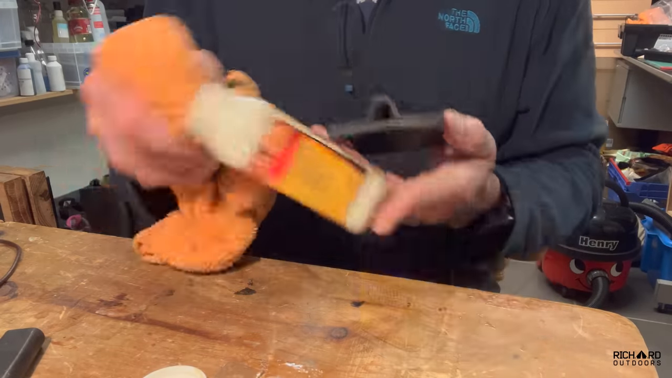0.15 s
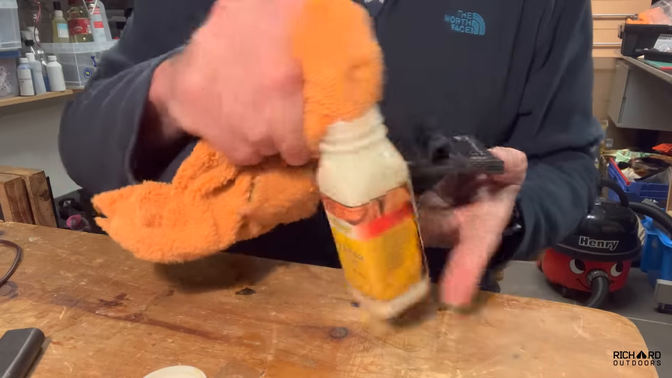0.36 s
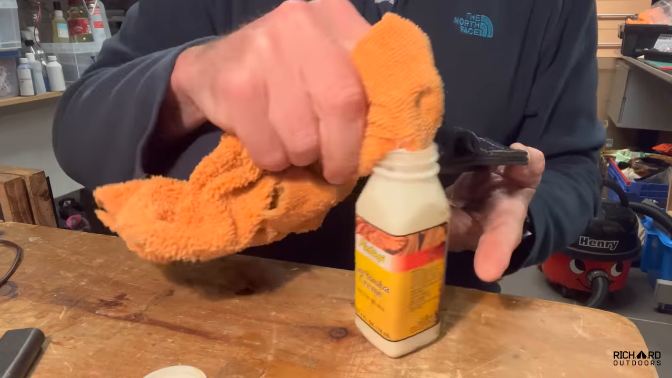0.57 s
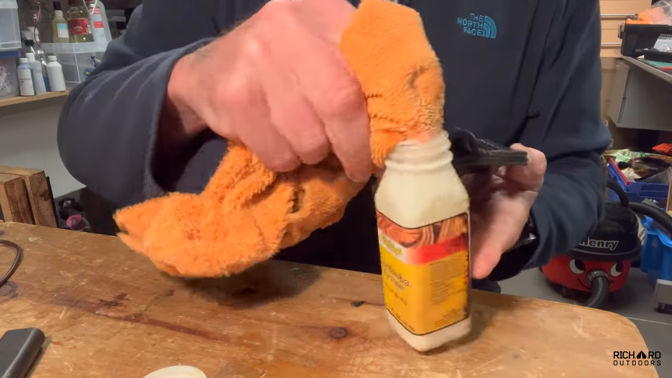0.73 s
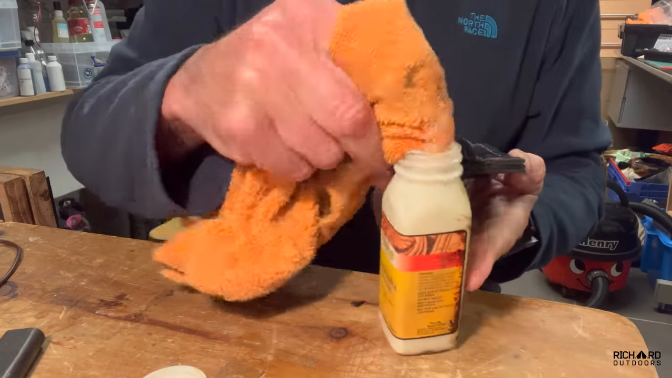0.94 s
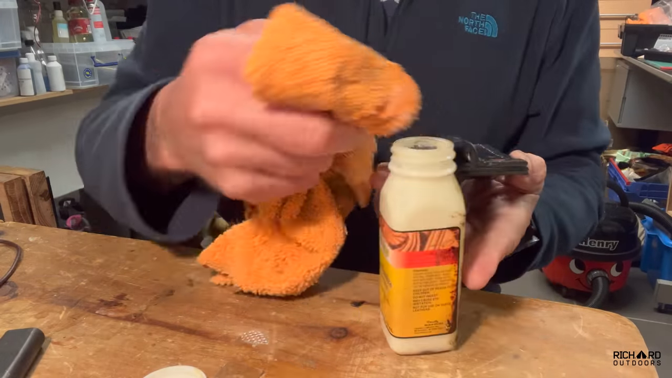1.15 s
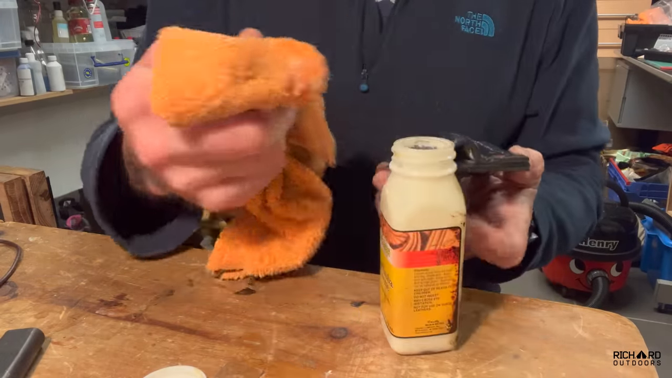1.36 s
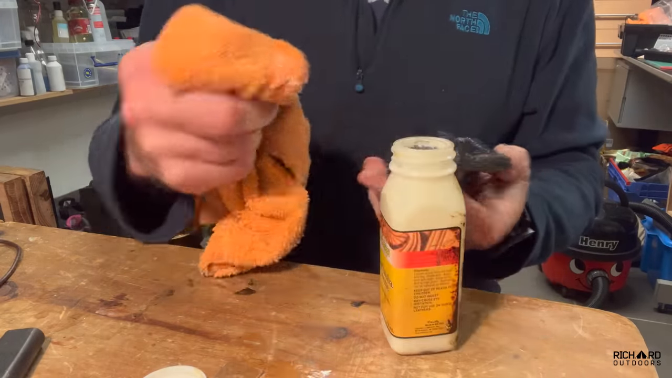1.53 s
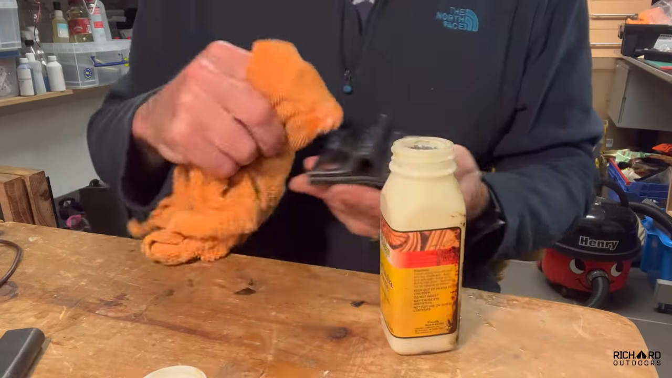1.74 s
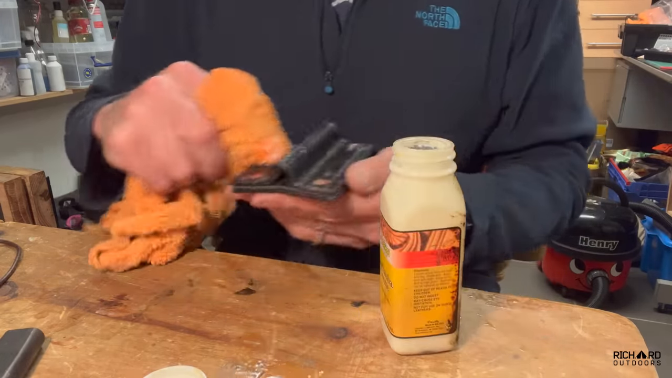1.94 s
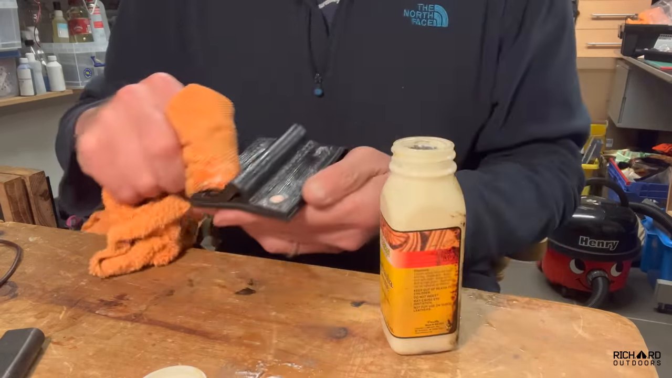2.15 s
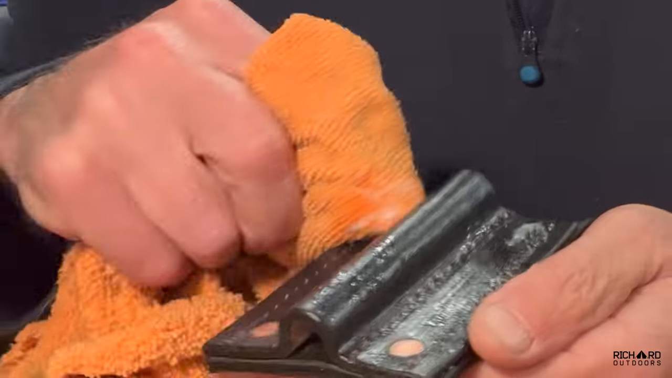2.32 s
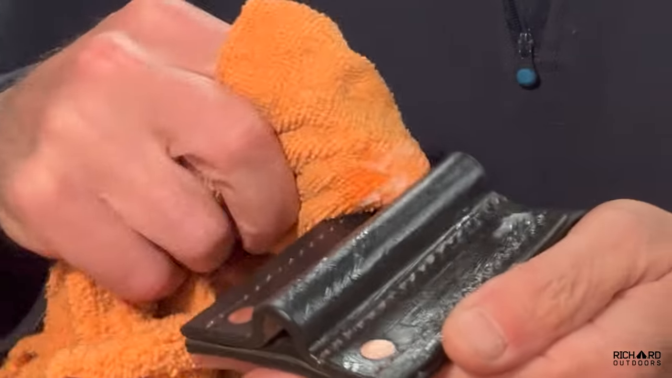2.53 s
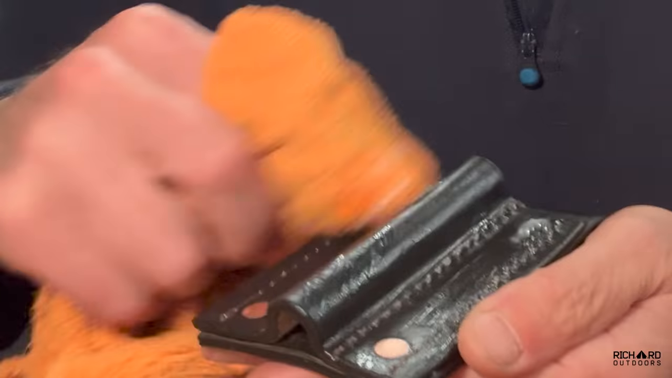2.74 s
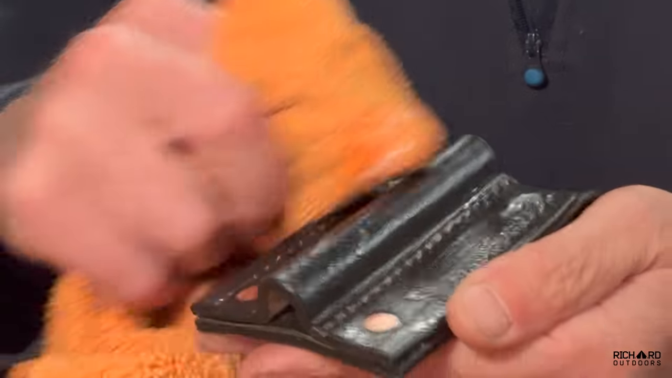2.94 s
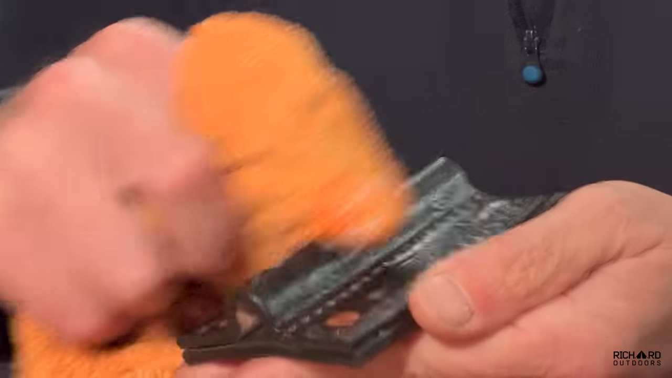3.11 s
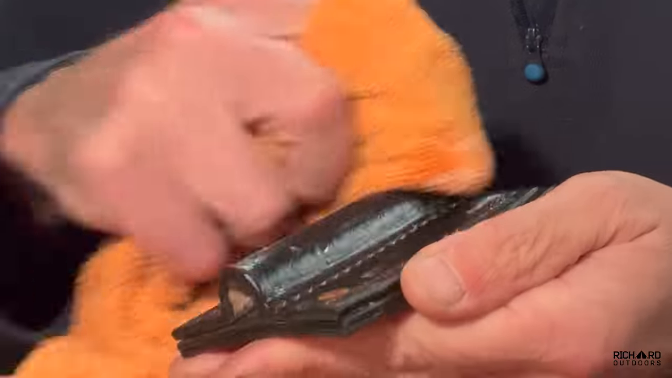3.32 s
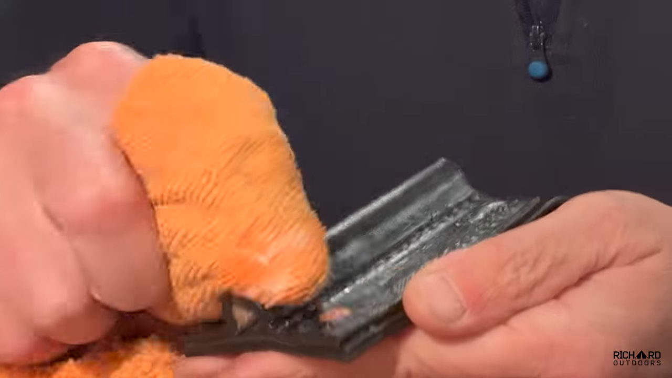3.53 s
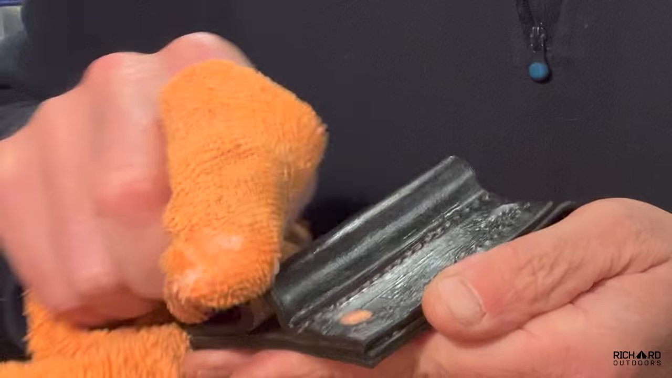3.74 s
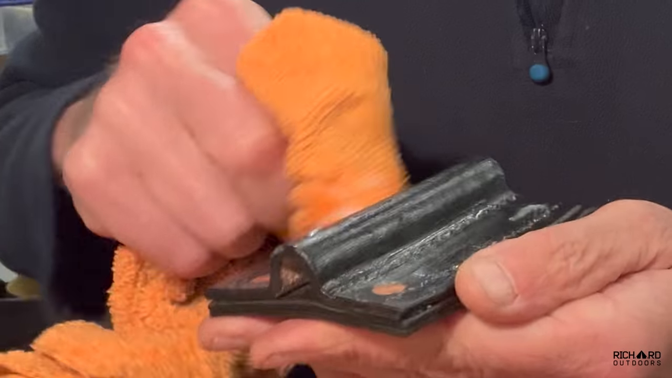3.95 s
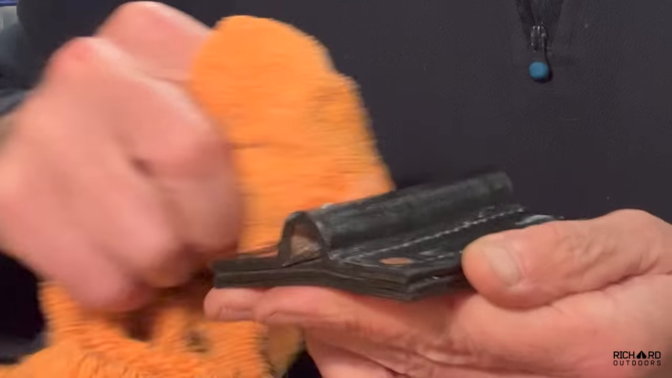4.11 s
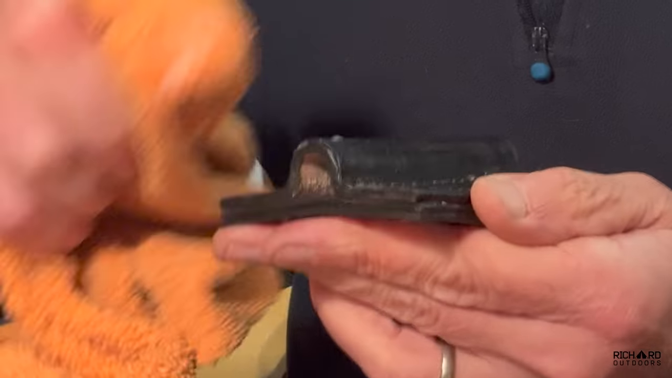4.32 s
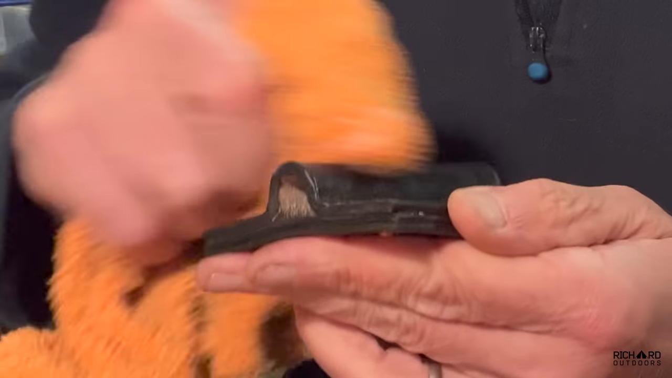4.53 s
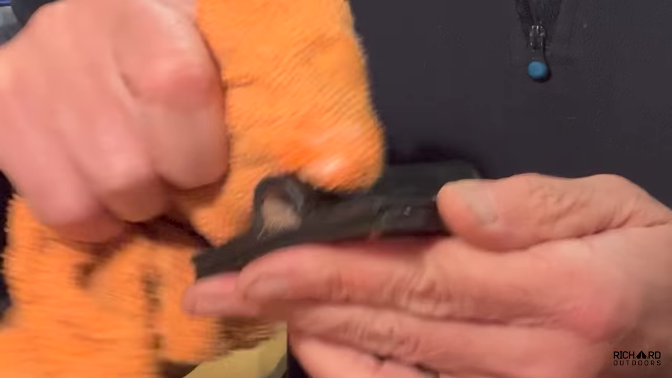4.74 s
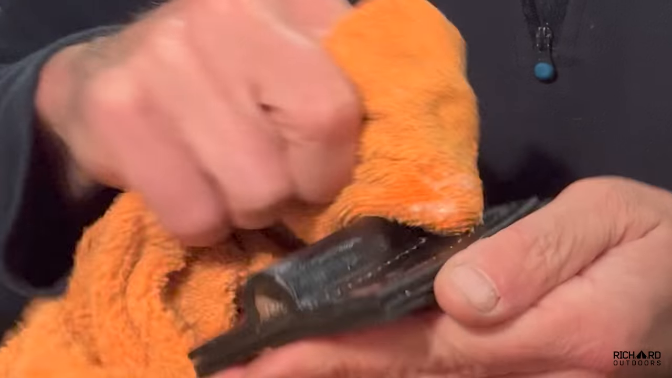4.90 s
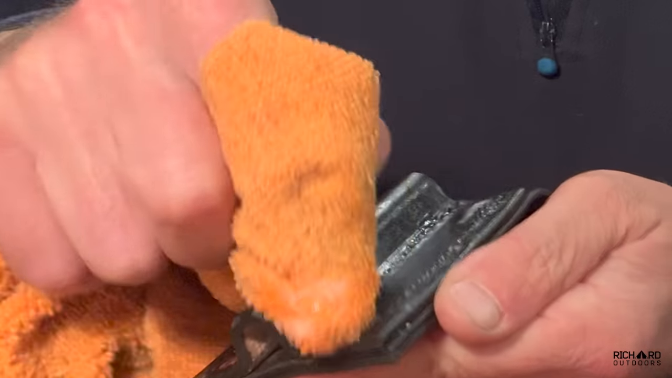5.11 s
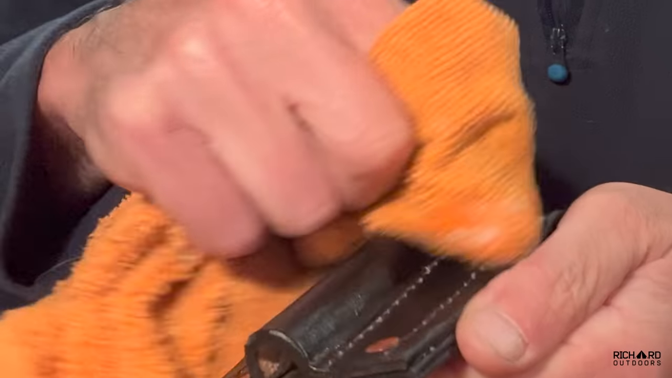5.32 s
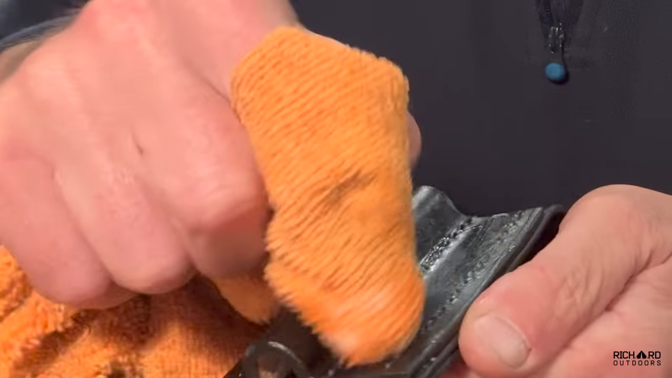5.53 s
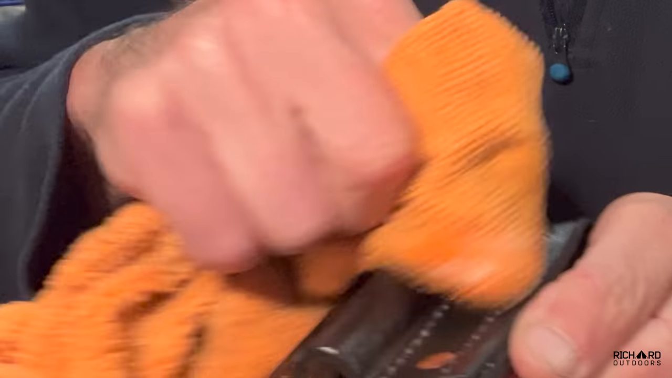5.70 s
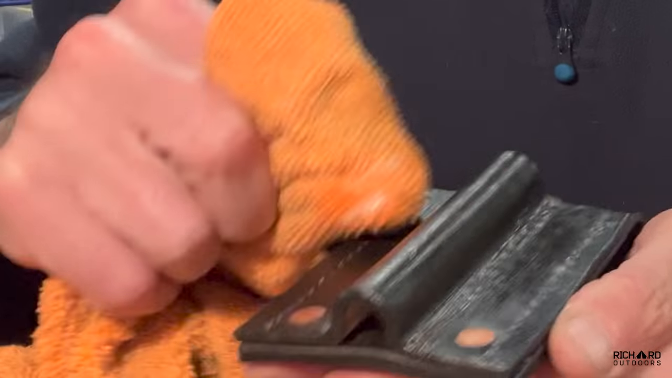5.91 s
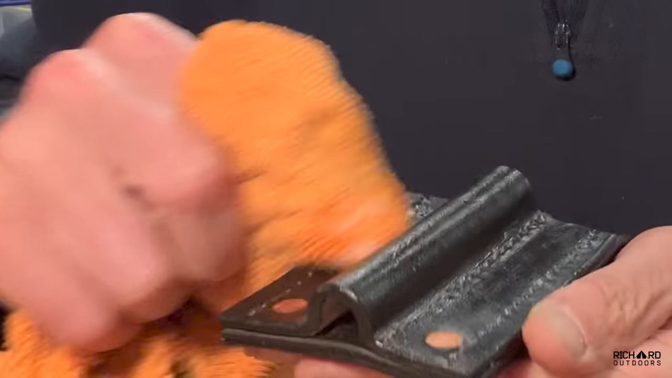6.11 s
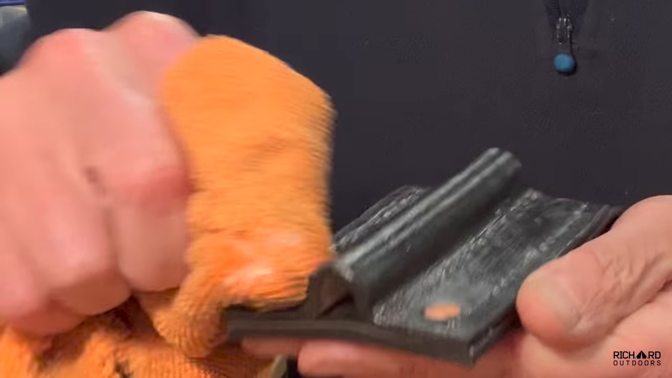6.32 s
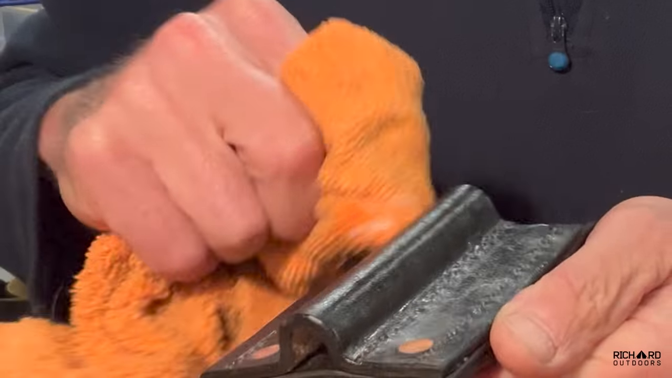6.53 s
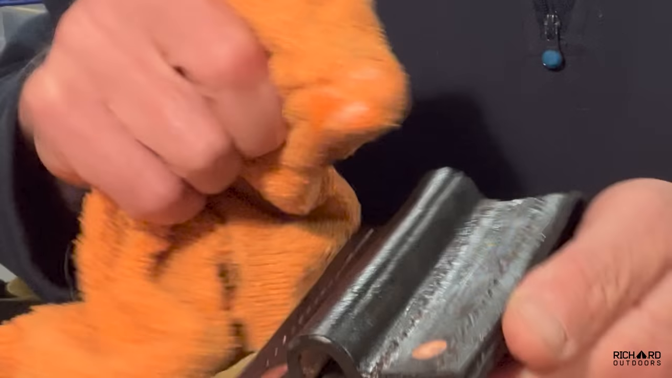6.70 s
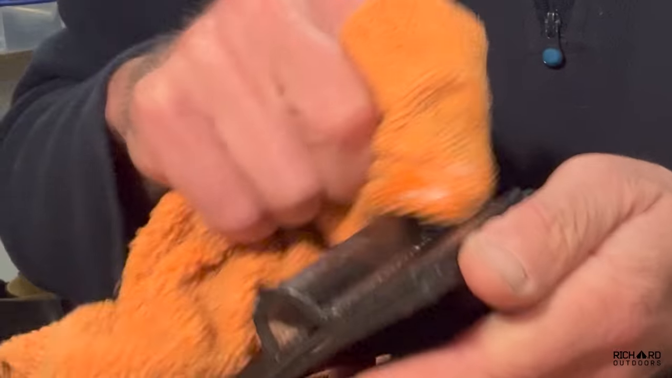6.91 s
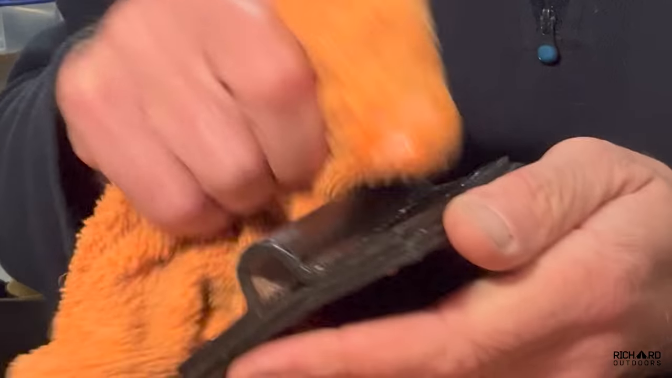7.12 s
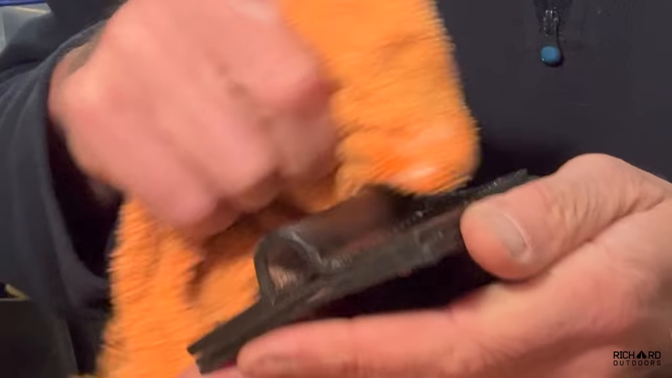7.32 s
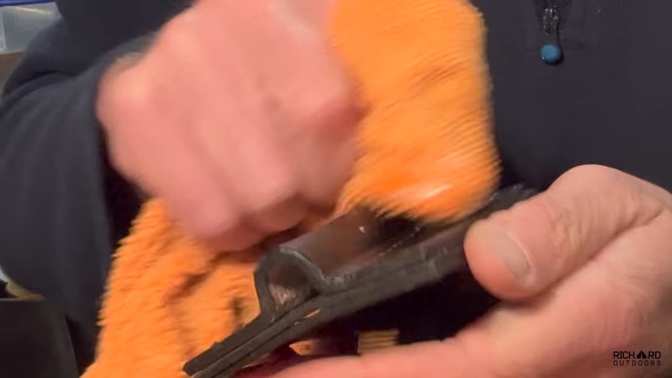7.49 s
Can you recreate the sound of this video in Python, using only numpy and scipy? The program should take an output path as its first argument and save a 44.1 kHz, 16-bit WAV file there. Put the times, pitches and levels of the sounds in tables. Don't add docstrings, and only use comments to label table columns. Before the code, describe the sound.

Close dry cloth rubbing on a small leather sheath, with dull knocks and tiny ticks, after a hollow bottle is set down over low workshop drone.

```python
import sys
import numpy as np
from scipy import signal
from scipy.fft import rfft, irfft, next_fast_len
from scipy.io import wavfile
from scipy.ndimage import uniform_filter1d, map_coordinates

SR = 44100
rng = np.random.default_rng(int(sys.argv[2]) if len(sys.argv) > 2 else 0)


def gain_from_decibels(decibels):
    exponent = np.asarray(decibels, float) / 20
    return 10 ** exponent


def file_out(sig):
    cols = np.atleast_2d(sig).T
    lim = np.clip(cols, -1, 1)
    pcm = np.round(lim * 32767).astype(np.int16)
    wavfile.write(sys.argv[1], SR, pcm)


N = 337541


def unit(x):
    return x / np.sqrt(np.mean(x ** 2) + 1e-20)


def along(points, hz):
    point_hz, value = np.transpose(points)
    return np.interp(np.log(hz + 1), np.log(point_hz + 1), value)


def curves(rows):
    s, *columns = np.transpose(rows)
    return [np.interp(np.arange(N) / SR, s, column) for column in columns]


def wobble(rate_hz):
    at = np.arange(0, N + 16, 16)
    knots = rng.standard_normal(int(N * rate_hz / SR) + 4)
    return np.interp(np.arange(N), at, map_coordinates(knots, [at * rate_hz / SR]))


def filtered(x, response):
    m = next_fast_len(N + SR // 2)
    return irfft(rfft(x, m) * response(np.fft.rfftfreq(m, 1 / SR)), m)[..., :N]


def shaped(x, points):
    return unit(filtered(x, lambda f: gain_from_decibels(along(points, f))))


def resonance(f, hz, width_hz):
    return 1j * f * width_hz / (hz * hz - f * f + 1j * f * width_hz)


def noise(patchy_db, grain_db):
    z = signal.stft(rng.standard_normal((2, N)), nperseg=512)[2]
    field = uniform_filter1d(rng.standard_normal(z.shape[1:]), 6, 0)
    field = uniform_filter1d(field, 8, 1)
    pair = signal.istft(z * gain_from_decibels(patchy_db * unit(field)), nperseg=512)[1][:, :N]
    return pair * gain_from_decibels(grain_db * wobble(900))


def ring(modes, attack_s, scatter_db):
    t = np.arange(SR // 4) / SR
    pair = np.zeros((2, len(t)))
    for hz, db, t60 in modes:
        turn = [[0], [-1.68 + rng.normal(0, 0.37)]]
        decay = gain_from_decibels(db + rng.normal(0, scatter_db) - 60 * t / t60)
        pair += decay * np.sin(2 * np.pi * hz * t + turn)
    onset = 1 - np.exp(-(t / attack_s) ** 2)
    return pair * onset * gain_from_decibels([[0], [-6]])


def tick(t60):
    return gain_from_decibels(-60 * np.arange(SR // 4) / SR / t60) * rng.standard_normal((2, SR // 4))


def add(out, s, x):
    start = round(s * SR)
    out[:, start:start + x.shape[1]] += x


def glides(rows, spread, edge):
    out = np.zeros((2, N + SR))
    for s, length_s, db, first_hz, last_hz in rows:
        n = round(length_s * SR)
        z = np.fft.fft(rng.standard_normal((2, 8192)) + 1j * rng.standard_normal((2, 8192)))
        f = np.fft.fftfreq(8192, 1 / SR)
        slow = np.fft.ifft(z / (1 + (f / (spread * first_hz)) ** 4))[:, :n]
        carrier = np.exp(2j * np.pi * np.cumsum(np.linspace(first_hz, last_hz, n)) / SR)
        arch = abs(np.sin(np.linspace(0, np.pi, n))) ** edge
        add(out, s, gain_from_decibels(db) * unit((slow * carrier).real) * arch)
    return out[:, :N]


# frequency in Hz, level in dB per Hz.
DRONE = [(22, -64), (35, -17), (55, -13.5), (80, -4), (130, -2.5), (230, -7), (330, -5.5), (440, -4.5),
         (500, -12.5), (600, -19.5), (750, -27.5), (1000, -46), (1600, -41.5), (3000, -79)]
# time in seconds, level in dB.
DRONE_DB = [(0.0, -47), (3.26, -47), (4.11, -48), (4.73, -47), (6.2, -46.5), (6.47, -49), (6.82, -44.5),
            (7.18, -48), (7.65, -43.5)]
# frequency in Hz, width in Hz, level in dB.
HUM = [(49.8, 1.57, -64), (100.2, 3.35, -57.5), (149, 2.85, -54.5), (198, 3.95, -57.5), (242, 4.53, -63),
       (436.4, 10, -57)]
# frequency in Hz, level in dB per Hz.
AIR = [(900, -120), (1300, -49), (3000, -7), (6000, 23), (10000, 26), (15700, -14)]


def workshop():
    level_db, = curves(DRONE_DB)
    drone = shaped(noise(patchy_db=1.5, grain_db=-2.0), DRONE)
    t = np.arange(N) / SR
    tones = np.zeros(N)
    for hz, width_hz, db in HUM:
        cycles = hz * t + np.cumsum(width_hz * wobble(12)) / SR
        tones += gain_from_decibels(db - 0.7 + 2.6 * wobble(7)) * np.sin(2 * np.pi * cycles)
    air = shaped(rng.standard_normal((2, N)), AIR)
    drift_db = 0.55 * wobble(5.01) + 0.33 * wobble(14)
    return gain_from_decibels(level_db - 0.24 + drift_db) * drone + tones * gain_from_decibels([[3], [-6]]) + gain_from_decibels(-78.5) * air


# frequency in Hz, t60 in seconds.
SHOP_T60 = [(200, .3), (1500, .28), (10000, .12)]


def walls(x, wet_db):
    hz, t, z = signal.stft(rng.standard_normal((2, SR // 3)), SR, nperseg=256)
    tail = signal.istft(z * gain_from_decibels(-60 * t / along(SHOP_T60, hz)[:, None]), SR, nperseg=256)[1]
    delayed = np.pad(x, ((0, 0), (300, 0)))
    wet = gain_from_decibels(wet_db) * signal.fftconvolve(delayed, tail / np.linalg.norm(tail[0]), axes=1)
    wet[:, :x.shape[1]] += x
    return wet


# time in seconds, thud in dB, wall in dB, tick in dB, thud pitch in Hz.
BOTTLE_HITS = [(0.161, -36, -30, -31.5, 446), (0.463, -1, -16, -34.5, 403), (0.653, -43, -11.5, -21, 314),
               (0.794, -27, -9, -22, 257), (0.842, -39.5, -5, -18, 265), (1.046, -41, -10, -33, 212),
               (1.085, -37, -11, -50, 249), (1.146, -33, -20, -35, 380), (1.198, -47, -14, -20, 432),
               (1.285, -45, -9, -14, 440), (1.328, -33, -19, -34, 424)]
# frequency in Hz, level in dB, t60 in seconds.
BENCH = [(122, -26.5, 0.075), (247.6, -20, .1), (300, -21, 0.098), (348, -12, 0.045), (436, -20, 0.043)]
FREE_WALL = [(560, -5, 0.023), (645, 6, 0.057), (703, -4, 0.088), (827, 2.5, 0.048), (1090, -8, 0.037),
             (1360, -16, 0.058), (1464, -15, 0.053), (1500, 5.5, 0.024), (1625, -4, 0.042),
             (1910, -10, 0.034), (2230, -20, 0.025), (2650, -18, 0.035), (3700, -22, 0.031),
             (5390, -18, 0.022)]
HELD_WALL = [(550, 11, 0.068), (656, 5.5, 0.068), (729, 7.5, 0.079), (834, -8, 0.07), (1100, -4.5, 0.077),
             (1243, -6.5, 0.065), (1370, -10, .05), (1470, -6, .05), (1630, -14, .04)]
HARD_DB, BASS_DB_PER_OCTAVE = -10, 26


def bottle():
    out = np.zeros((2, N + SR))
    (low_hz, low_db, low_t60), *upper_bench = BENCH
    for s, db, wall_db, tick_db, hz in BOTTLE_HITS:
        if db > HARD_DB:
            wall = ring(FREE_WALL, attack_s=0.0018, scatter_db=0.5)
        else:
            wall = ring(HELD_WALL, attack_s=0.0025, scatter_db=2.5)
        snap = tick(t60=0.006)
        scuff = uniform_filter1d(tick(t60=0.06), size=5)
        crack = gain_from_decibels(4.5) * snap + gain_from_decibels(1.5) * scuff
        add(out, s, walls(gain_from_decibels(db + wall_db - 1.5) * wall + gain_from_decibels(db + tick_db + 2.5) * crack, wet_db=-14))

        thud = (hz, 0, 0.021 * (430 / hz) ** 2.6)
        bass_db = low_db - 13 + BASS_DB_PER_OCTAVE * np.log2(430 / hz)
        bass = (low_hz, bass_db, 1.5 * low_t60)
        bench = ring([thud, bass] + upper_bench, attack_s=0.0044, scatter_db=0.5)
        add(out, s + 0.0018, walls(-gain_from_decibels(db + 12.3) * bench, wet_db=-22))
    return out[:, :N]


# start in seconds, length in
# seconds, level in dB, first Hz, last Hz.
SHUFFLES = [(0.5, .1, -44.5, 329, 352), (0.835, 0.053, -43, 326, 300), (0.845, 0.016, -58, 724, 700),
            (0.98, 0.055, -62, 780, 726), (1.045, 0.038, -43, 334, 265), (1.048, 0.024, -54, 740, 720),
            (1.085, 0.043, -42, 300, 330), (1.088, .03, -54, 696, 720), (1.14, 0.056, -46.5, 395, 330),
            (1.145, 0.037, -58, 785, 755), (1.28, 0.019, -62, 1190, 1200), (1.325, 0.046, -46.5, 424, 378),
            (0.793, 0.039, -38, 380, 348), (0.793, 0.038, -52, 560, 550), (0.16, .02, -52, 452, 450),
            (0.19, 0.018, -51, 430, 430), (0.435, 0.035, -61, 1500, 1550), (0.49, 0.1, -61.5, 1500, 1400),
            (0.66, 0.116, -70.5, 1197, 1300), (0.86, .17, -70, 1350, 1250), (1.19, .025, -66, 1500, 1600)]


def shuffles():
    return glides(SHUFFLES, spread=0.28, edge=0.6)


# time in seconds, sheath in dB, palm in dB, palm pitch in Hz, rim in dB.
KNOCKS = [(2.207, -22.5, -7, 379, -28), (2.699, -52, 4, 417, -9), (2.748, -34, -7.5, 428, -28),
          (2.808, -49, 6, 330, -22), (3.055, -28, -12, 363, -19.5), (3.818, -39.5, -23, 420, -3.5),
          (4.189, -49.5, 2, 422, -10), (4.835, -12.5, -13.5, 359, -19.5), (4.962, -23, -9, 412, -26),
          (5.798, -47.5, -1, 410, -22), (6.431, -25.5, -6, 401, -31), (6.667, -28, -9, 389, -17)]
# frequency in Hz, level in dB, t60 in seconds.
SHEATH = [(877, -9, 0.03), (970, -19, .04), (1109, -9, 0.04), (1250, -18, 0.025), (740, -16, 0.052),
          (599, -11, 0.04)]
PALM = [(250.4, -10, 0.1), (290, -11, .08), (338, -6.5, 0.073)]
RIM = [(1400, 8, 0.025), (1624, -0.5, 0.03), (1880, -7.5, 0.044), (2190, -11, 0.048), (3630, -20.5, 0.024)]
BLOW_HZ, STIFFEN_HZ_PER_DB, BLOW_T60 = 1050, 8.5, 0.016


def knocks():
    out = np.zeros((2, N + SR))
    for s, db, low_db, palm_hz, rim_db in KNOCKS:
        blow = (BLOW_HZ + STIFFEN_HZ_PER_DB * db, 2.2, BLOW_T60)
        leather = ring([blow] + SHEATH, attack_s=0.0009, scatter_db=0)
        leather += gain_from_decibels(rim_db + 1.0) * ring(RIM, attack_s=0.00077, scatter_db=1.0)
        add(out, s + 0.0011, walls(gain_from_decibels(db + 6.0) * leather + gain_from_decibels(db - 50) * tick(t60=0.0086), wet_db=-17))
        palm = ring([(palm_hz, 0, 0.045)] + PALM, attack_s=0.0018, scatter_db=0.1)
        add(out, s + 0.0026, walls(gain_from_decibels(db + low_db + 10.2) * palm, wet_db=-16))
    return out[:, :N]


# time in seconds, peak in dB, pitch in Hz, fold pop in dB.
TICKS = [(0.1735, -50, 3460, -17), (0.24, -48.5, 2550, -11), (0.563, -38, 4300, -5), (0.6516, -50, 3690, 2),
         (0.779, -51, 2670, -7), (0.8654, -54, 5900, -14), (1.2678, -50, 2600, -14),
         (1.4734, -68, 2590, -8), (1.5125, -51, 5080, -13), (1.5486, -43, 2980, -9),
         (1.608, -50, 4900, -28.5), (1.7834, -38.5, 3810, -15), (2.0376, -55, 3500, -14),
         (2.1256, -47, 4320, 8), (2.317, -42, 3180, 0), (2.5655, -40, 3150, -2.5),
         (2.7244, -35.5, 3780, -11), (3.031, -45, 5130, 4), (3.578, -40.5, 2800, -2), (4.08, -46, 3800, -6),
         (5.694, -48, 2390, -12)]
# time in seconds, peak in dB.
FLICKS = [(1.1707, -56), (1.6102, -49), (1.7744, -46), (1.8941, -44), (3.5538, -45), (4.3121, -57),
          (4.3575, -50), (4.3954, -56), (4.4233, -59), (5.5344, -51), (5.8694, -62), (6.0666, -44),
          (6.3081, -54)]
# time in seconds, level in dB, pitch in Hz.
RIVETS = [
    (4.397, -64, 3300),
    (5.9938, -49, 3740),
    (7.4335, -39.5, 3630),
]


def snags():
    out = np.zeros((2, N + SR))
    for s, db, hz, fold_db in TICKS:
        pitch = ring([(hz, -3, 0.003), (1450, fold_db - 8.0, 0.009)], attack_s=0.0002, scatter_db=2.0)
        add(out, s, gain_from_decibels(db - 9.5) * np.diff(tick(t60=0.012), prepend=0) + gain_from_decibels(db + 8.5) * pitch)
    for s, db in FLICKS:
        add(out, s, gain_from_decibels(db - 6.0) * np.diff(tick(t60=0.006), prepend=0))
    for s, db, hz in RIVETS:
        note = ring([(hz, 0, 0.018), (1.08 * hz, -4, 0.014)], attack_s=0.0008, scatter_db=1)
        add(out, s, gain_from_decibels(db) * note)
    return out[:, :N]


# start in seconds, length in seconds, level in dB, first Hz, last Hz.
SIGHS = [(1.93, 0.11, -55, 1250, 1500), (2.12, .08, -55, 1346, 1250), (2.245, 0.065, -56, 1500, 1456),
         (2.415, 0.062, -69, 1200, 1050), (2.525, 0.057, -62, 1400, 1500), (2.67, 0.034, -58, 950, 950),
         (2.86, 0.068, -60, 1400, 1360), (2.945, 0.056, -57, 1500, 1650), (3.24, .08, -59, 1250, 1400),
         (3.44, 0.067, -53, 1300, 1500), (3.59, 0.079, -64, 1100, 1200), (3.73, 0.12, -61, 1353, 1400),
         (4.075, 0.05, -52.5, 1250, 1210), (4.12, 0.077, -47.5, 1150, 1296),
         (4.165, 0.039, -45, 1298, 1400), (4.52, 0.079, -47.5, 1457, 1194), (5.2, 0.052, -67, 1550, 1400),
         (5.32, 0.047, -64, 1500, 1630), (5.575, .12, -50, 955, 860), (5.66, 0.13, -59, 1650, 1680),
         (5.8, 0.078, -61, 1450, 1546), (5.88, 0.047, -64.5, 1500, 1500), (6.1, 0.088, -46, 1205, 1346),
         (6.34, 0.099, -63, 1207, 1300), (6.49, 0.095, -56, 1350, 1725), (6.85, 0.097, -54, 1550, 1438),
         (7.0, .1, -70.5, 1100, 1000), (7.15, .11, -58, 1500, 1480), (7.3, .1, -66.5, 997, 1100),
         (7.48, 0.064, -58, 1500, 1605), (4.32, 0.056, -71, 2150, 2150), (6.67, .09, -60, 945, 850),
         (2.72, .09, -54, 1500, 1400), (4.68, .06, -62, 1200, 1500), (4.815, .025, -50, 1100, 1200),
         (3.4, .09, -56, 750, 720)]


def sighs():
    return glides(SIGHS, spread=0.16, edge=0.96)


# start in seconds, length in seconds, pressure in dB, nap in dB, fold
# in dB.
PUSHES = [(0.121, 0.16, -70, -12, -18), (0.476, 0.19, -68, -5, 1), (0.74, 0.35, -72.5, -1.5, 1.0),
          (1.74, 0.19, -62.5, -6.5, -23), (2.079, 0.32, -55.5, -5.5, 4.5), (2.393, 0.071, -69.5, -14, -2),
          (2.689, 0.15, -46.5, -11, 0.5), (2.818, 0.14, -65, -5, 3), (2.991, 0.21, -53.5, -2, -1),
          (3.194, 0.18, -55.5, 0.5, 1), (3.333, 0.24, -48.5, -7.5, -7.5), (3.565, 0.13, -62, -4.5, -1.5),
          (3.683, 0.27, -53.5, -6, 5), (3.82, 0.23, -61.5, -5, 3.5), (4.04, 0.22, -53.5, -6, -4.5),
          (4.472, 0.17, -54.5, -1.5, 2), (4.778, 0.14, -52.5, -3.5, 6.5), (5.354, 0.26, -55.0, -2, 0.5),
          (5.743, 0.17, -62.5, 1, 6.5), (6.028, 0.23, -52.5, -3.5, 2), (6.92, 0.25, -77.5, 0, -3),
          (7.128, 0.15, -59, -0.5, 8)]
PULLS = [(0.261, 0.108, -91, -4.5, 19), (0.651, 0.29, -69, 1, 2), (1.09, 0.19, -70.5, -5.5, -1.5),
         (1.231, 0.094, -65.5, -12, -3.5), (1.298, 0.25, -81, 2, -12.0), (1.462, 0.18, -66, -3.5, -5),
         (1.583, 0.17, -62.5, -3, -25), (1.819, 0.24, -56, -3.5, -1.5), (2.492, 0.14, -66.5, -8, -6),
         (2.606, 0.13, -63.5, -11, -1.5), (2.892, 0.14, -57.5, -3, 4.5), (4.23, 0.26, -72.5, -1.5, -25),
         (4.59, 0.2, -56, -5, -1.5), (4.84, 0.35, -57.0, -5.5, 0), (5.146, 0.24, -53.5, -2.5, 3.5),
         (5.57, 0.22, -53.5, 0.5, 4), (5.82, 0.33, -75, -12, -4), (6.213, 0.46, -56.5, -5.5, 2.5),
         (6.824, 0.15, -56.5, 2, 7), (7.23, 0.21, -64, -2.5, 0), (7.43, 0.14, -56, -4.5, 3.5),
         (5.262, 0.08, -55.5, 3, 5),
    (6.48, 0.11, -64, 5, 0),
    (7.624, .08, -69, -2, 3),
    (0.184, 0.022, -68, -8, 3),
    (0.251, .02, -70, -8, -10),
    (0.554, 0.027, -58.5, -17, -1),
]
RUSTLES = [(4.2, .12, -70, -6, -10), (4.36, .1, -72, -9, -10), (4.74, .08, -70, -3, -5),
           (5.1, .1, -71, -3, -5), (5.34, .08, -66, -3, -3), (5.9, .15, -76, -3, -5),
           (6.2, .1, -72, -3, -3), (6.56, .1, -69, -4, -4), (6.68, .14, -78, -3, 0),
           (3.5, .08, -66, -3, -3), (3.99, .08, -66, -3, -3)]
# pile in dB, nap in dB, fold in dB.
REST_DB = (-78.5, -84, -81.5)
PUSH_SKEW, PUSH_SHARP = 0.87, 2.9
PULL_SKEW, PULL_SHARP = 1.144, 1.98


def strokes():
    power = np.outer(gain_from_decibels(REST_DB) ** 2, np.ones(N + SR))
    pushing = (PUSHES, PUSH_SKEW, PUSH_SHARP)
    pulling = (PULLS + RUSTLES, PULL_SKEW, PULL_SHARP)
    for rows, skew, sharp in [pushing, pulling]:
        for s, length_s, db, nap_db, fold_db in rows:
            phase = np.pi * np.linspace(0, 1, round(length_s * SR)) ** skew
            arch = abs(np.sin(phase)) ** sharp
            add(power, s, np.outer(gain_from_decibels([db, db + nap_db, db + fold_db]), arch) ** 2)
    return np.sqrt(power[:, :N])


# frequency in Hz, level in dB per Hz.
PILE = [(300, -120), (600, 5), (1500, -2.5), (2150, -4.5), (2700, -1.5), (3800, -0.5), (6000, -3.5),
        (8200, -1.5), (9400, -8.5)]
NAP = [(6000, -60), (7200, -17), (8200, -12), (9500, -3), (12000, 0), (14000, -3), (15800, -5)]
# frequency in Hz, width in Hz, level in dB.
WEAVE = [(2390, 57, 3.5), (2800, 100, 3), (3150, 90, 3), (3700, 130, 4), (4260, 100, 2), (4900, 120, 1.5)]
# frequency in Hz, width in Hz, level in dB.
FOLD_AIR = [(780, 310, 13.5), (1091, 410, -2.5), (1280, 630, 1.5), (1527, 280, -2.5), (1700, 100, -3)]
# time in seconds, pitch in Hz.
OPENING = [(0, 960), (1.5, 1080), (2.0, 1280), (2.25, 1050), (2.57, 1470), (2.75, 1310), (2.95, 1540),
           (3.1, 1090), (3.8, 1400), (4.19, 1200), (4.53, 1360), (5.0, 1020), (5.49, 1360), (5.655, 935),
           (5.8, 1390), (6.13, 1150), (6.46, 1200), (6.9, 1500)]


def cloth():
    drag, brush, blow = strokes()
    fold_hz, = curves(OPENING)
    catch_db = 1.26 * wobble(45) + 0.86 * wobble(16)

    def pile_response(f):
        weave_db = sum(db * np.exp(-((f - hz) / width_hz) ** 2) for hz, width_hz, db in WEAVE)
        return gain_from_decibels(along(PILE, f) + weave_db)

    def fold_response(f):
        return np.array([[resonance(f, hz, width_hz) ** 2] for hz, width_hz, _ in FOLD_AIR])

    pile = gain_from_decibels(-0.77) * unit(filtered(noise(patchy_db=1.8, grain_db=1.5), pile_response))
    nap = shaped(noise(patchy_db=2.5, grain_db=2), NAP)
    tones = filtered(noise(patchy_db=2.0, grain_db=3.0), fold_response)
    near = np.array([np.exp(-np.log(fold_hz / hz) ** 2 / 0.05) + 0.1 for hz, *_ in FOLD_AIR])
    near /= np.linalg.norm(near, axis=0)
    fold = sum(share * gain_from_decibels(db) * unit(tone) for share, tone, (*_, db) in zip(near, tones, FOLD_AIR))
    return gain_from_decibels(catch_db) * (gain_from_decibels(5.0) * drag * pile + gain_from_decibels(4.0) * brush * nap + blow * fold)


def scene():
    floor_hz = 62.3
    hits = filtered(bottle() + knocks(), lambda f: (1j * f / (floor_hz + 1j * f)) ** 2)
    rubs = cloth() + snags() + sighs() + shuffles()
    return hits + walls(rubs, wet_db=-15.5)[:, :N] + workshop()


def thin_treble(left, right):
    hz, _, z = signal.stft([left + right, left - right], SR, nperseg=2048)
    power = uniform_filter1d(abs(z) ** 2, size=14, axis=1)
    treble = power[:, hz > 3000].sum(axis=(0, 1))
    steady = treble < gain_from_decibels(11) * np.roll(treble, 1)
    choices = rng.standard_normal((z.shape[1] // 24 + 1, z.shape[2] // 3 + 1))
    blocks = np.kron(choices, np.ones((24, 3)))[:z.shape[1], :z.shape[2]]
    limit_db = -5 + blocks + np.zeros((2, 1, 1))
    limit_db[0, hz < 11000] = 5 * limit_db[0, hz < 11000] + 15.5
    weaker = power < power[::-1] * gain_from_decibels(2 * np.minimum(limit_db, -3))
    weak = weaker & (hz[:, None] > 6200) & steady
    mid, side = signal.istft(z * ~weak, SR, nperseg=2048)[1][:, :N] / 2
    return np.array([mid + side, mid - side])


def band_limit(x):
    return signal.sosfilt(signal.butter(12, 15800, fs=SR, output="sos"), x)


# frequency in Hz, lead in half turns.
LEAD = [(50, 0.12), (100, -.12), (150, -0.34), (250, -0.16), (400, -0.17), (470, -0.34), (620, -0.93),
        (720, -0.77), (900, -0.3), (2000, 0.34), (5000, 0.46)]
# frequency in Hz, likeness from 0 to 1.
ALIKE = [(50, .95), (110, .9), (250, 0.16), (500, 0.16), (1000, 0.49), (2500, 0.54), (5000, 0.76)]
# frequency in Hz, lead in half turns, likeness.
SPACING = [(6300, .65, .4), (7400, .9, .93), (8100, 1, .97), (8800, .9, .93), (9600, .5, .75),
           (10500, .12, .93), (11500, 0, .99), (12600, -.12, .93), (13400, -.5, .75), (14300, -.88, .93),
           (15000, -1, .99)]
# frequency in Hz, left minus right in dB.
LEAN = [(100, 0), (300, -1.2), (550, -1.5), (870, 1), (1150, -1.5), (2000, 1.3), (4000, -4), (6000, -5)]


def record(dry):
    lead = LEAD + [(hz, turns) for hz, turns, _ in SPACING]
    alike = ALIKE + [(hz, share) for hz, _, share in SPACING]
    side = np.array([[1], [-1]])

    def split(f):
        angle = np.arccos(np.clip(along(alike, f), -1, 1)) / 2
        return np.array([np.cos(angle), np.sin(angle)])

    def steer(f):
        lean_db = along(LEAN + [(7000, 0)], f)
        return gain_from_decibels(side * lean_db / 2) * np.exp(-side * 1j * np.pi * along(lead, f) / 2)

    common, scattered = filtered(dry, split)
    left, right = filtered(common + side * scattered, steer)
    return band_limit(thin_treble(left, right))


dry = scene()
out = record(dry)
file_out(out)
```